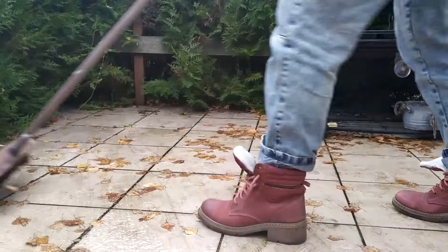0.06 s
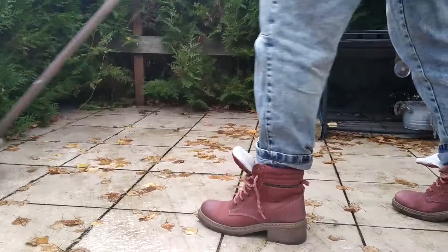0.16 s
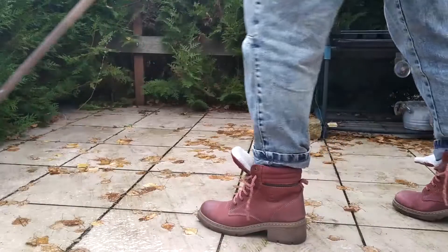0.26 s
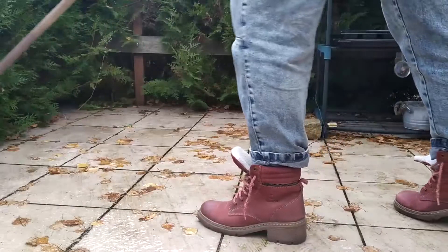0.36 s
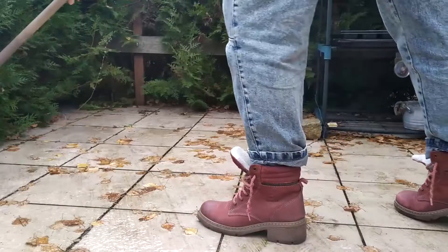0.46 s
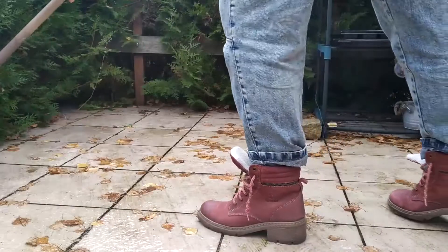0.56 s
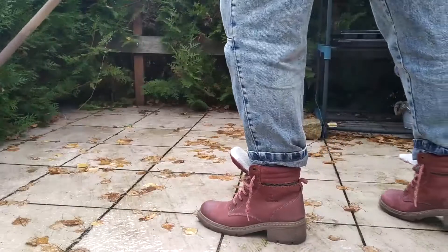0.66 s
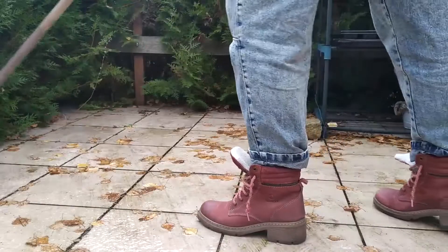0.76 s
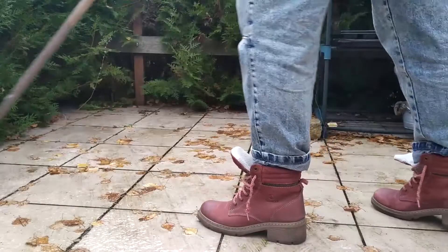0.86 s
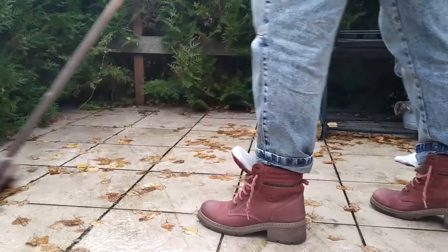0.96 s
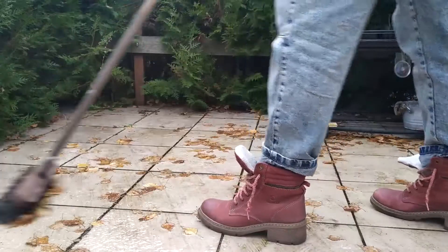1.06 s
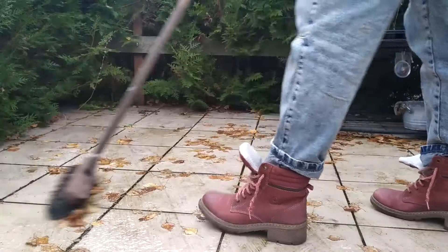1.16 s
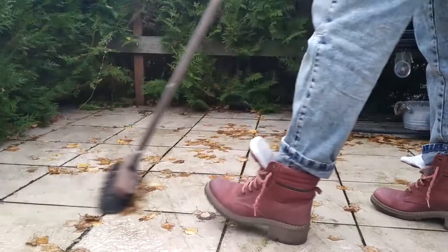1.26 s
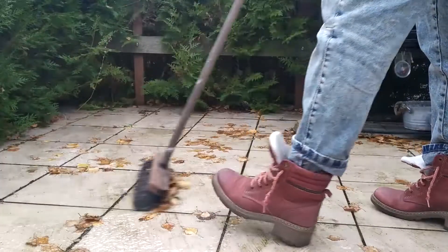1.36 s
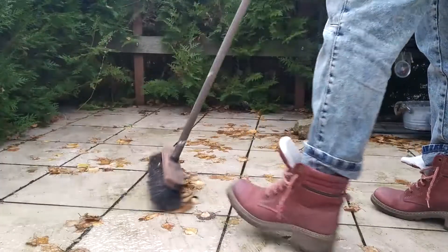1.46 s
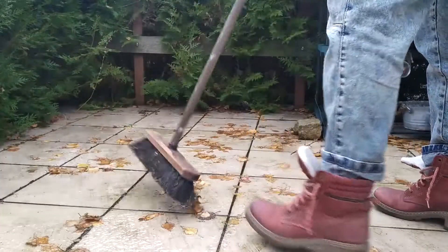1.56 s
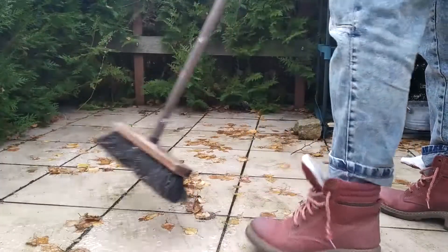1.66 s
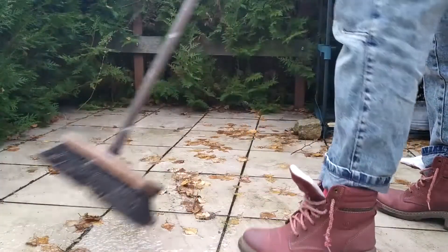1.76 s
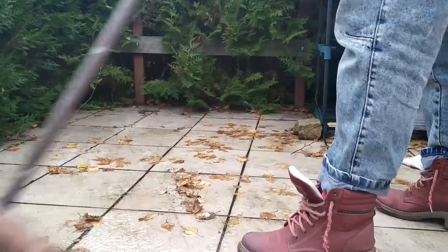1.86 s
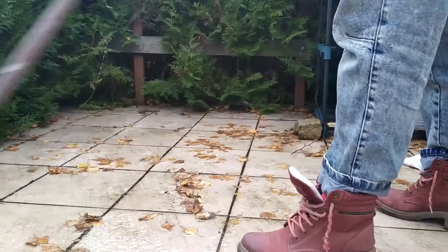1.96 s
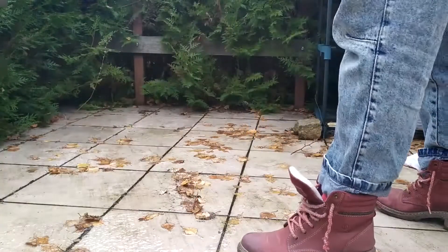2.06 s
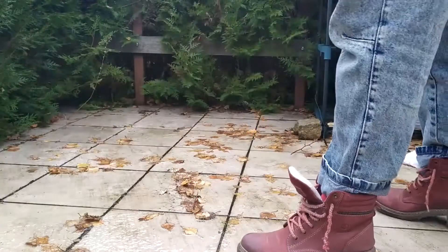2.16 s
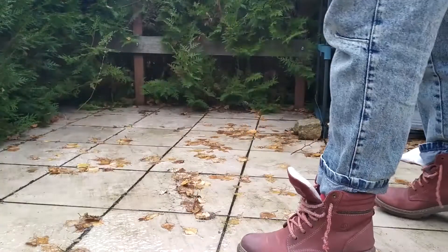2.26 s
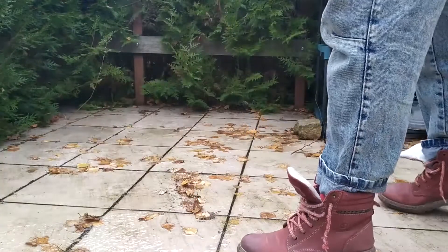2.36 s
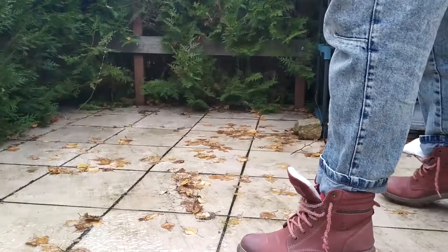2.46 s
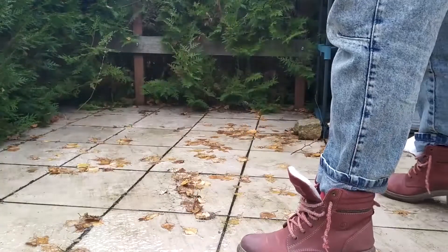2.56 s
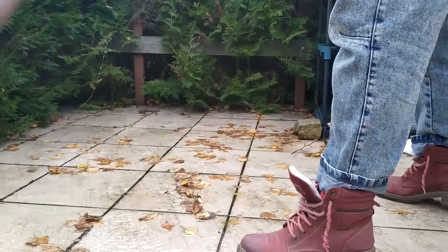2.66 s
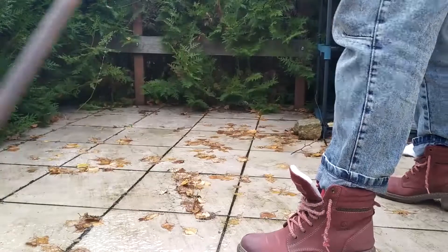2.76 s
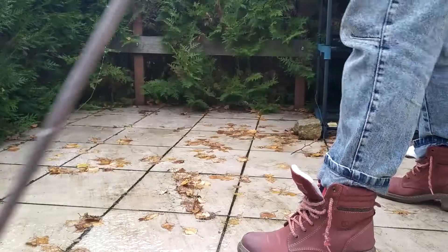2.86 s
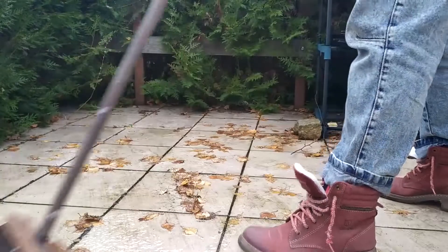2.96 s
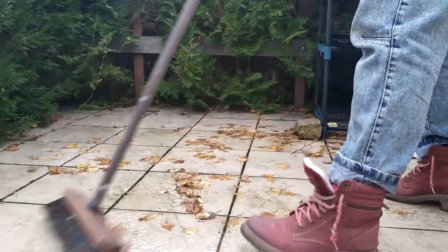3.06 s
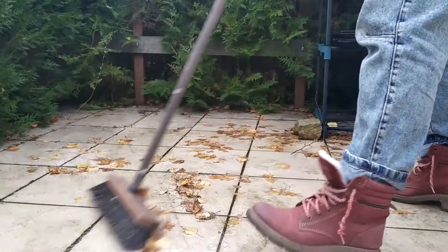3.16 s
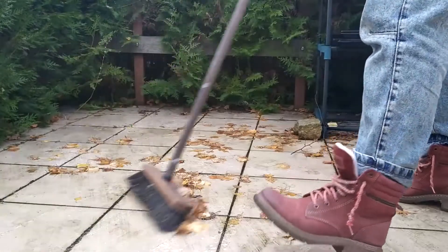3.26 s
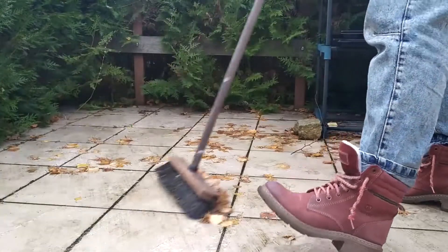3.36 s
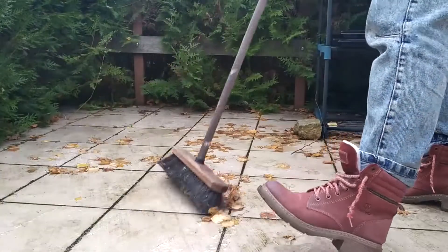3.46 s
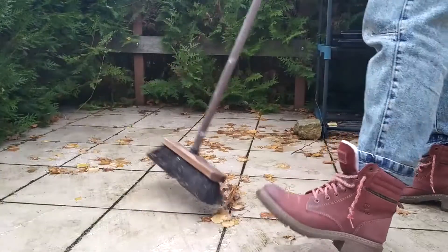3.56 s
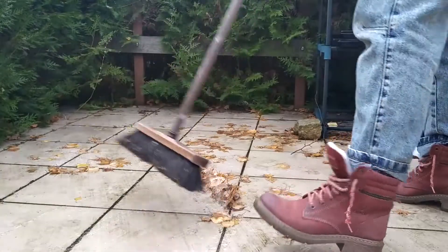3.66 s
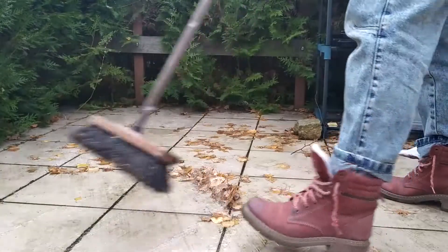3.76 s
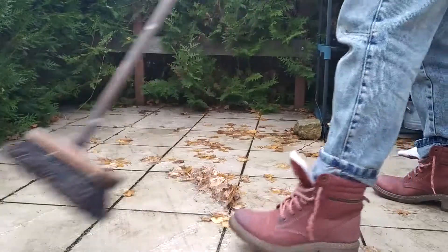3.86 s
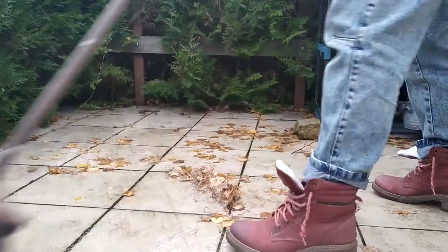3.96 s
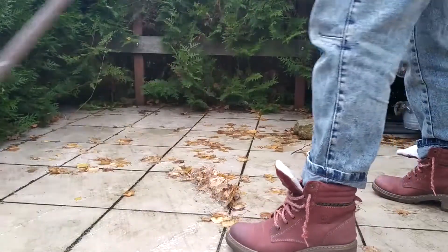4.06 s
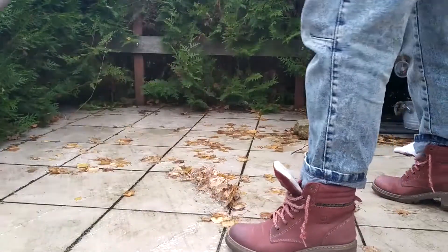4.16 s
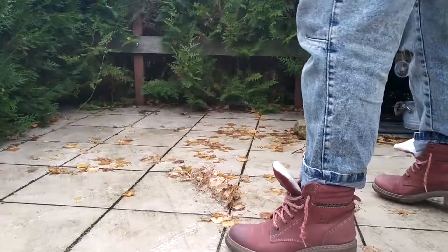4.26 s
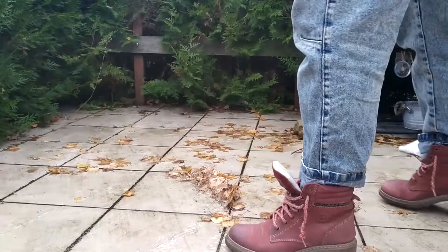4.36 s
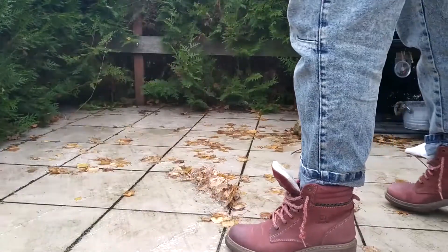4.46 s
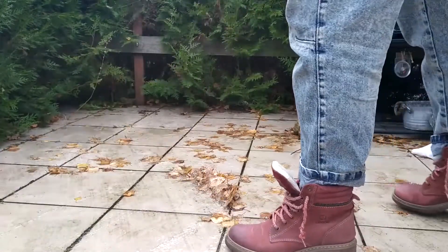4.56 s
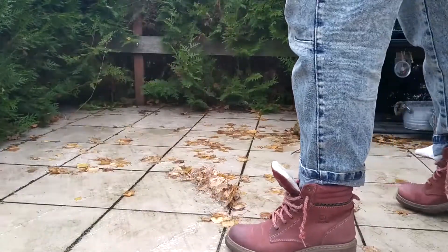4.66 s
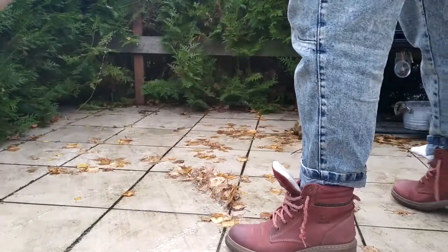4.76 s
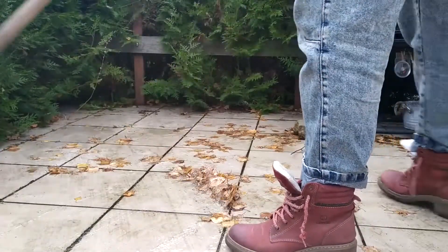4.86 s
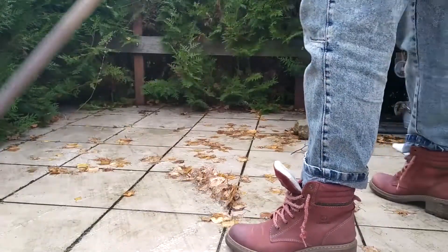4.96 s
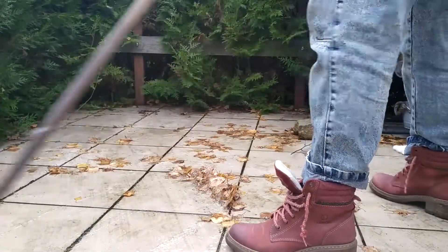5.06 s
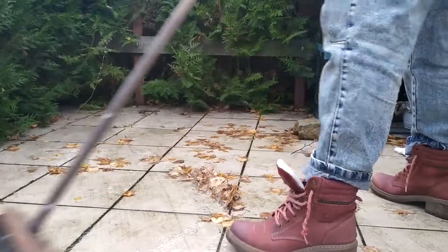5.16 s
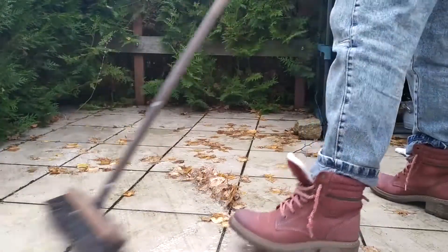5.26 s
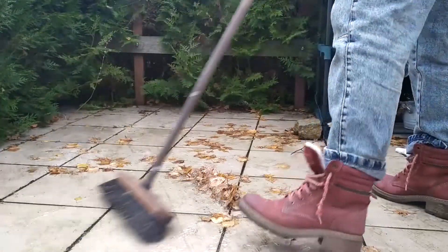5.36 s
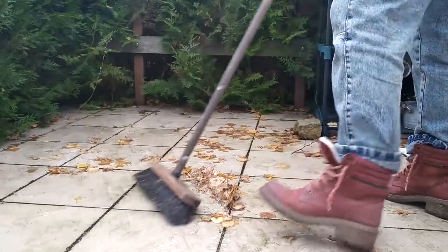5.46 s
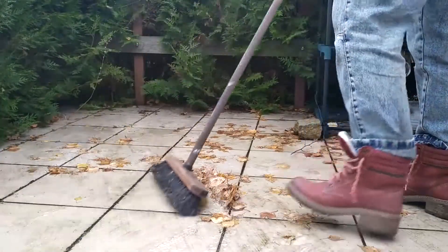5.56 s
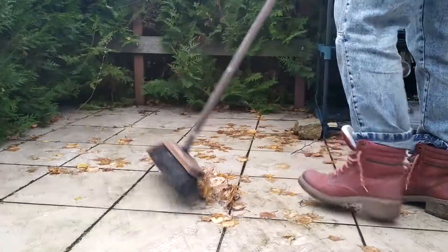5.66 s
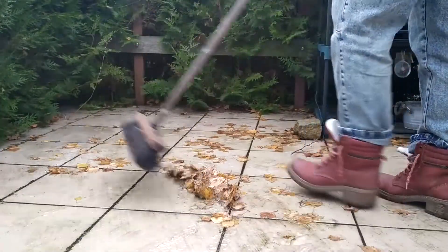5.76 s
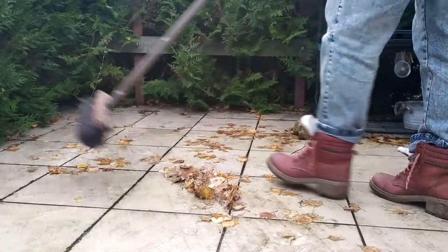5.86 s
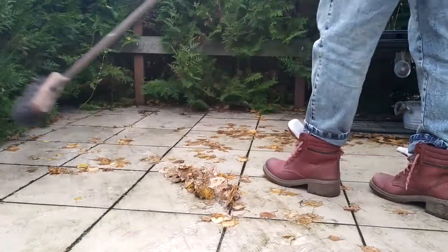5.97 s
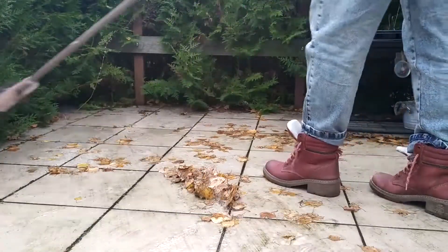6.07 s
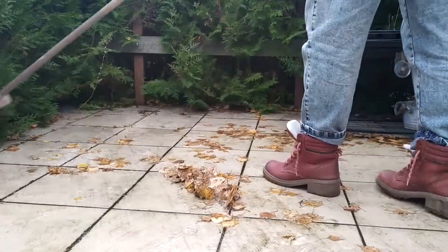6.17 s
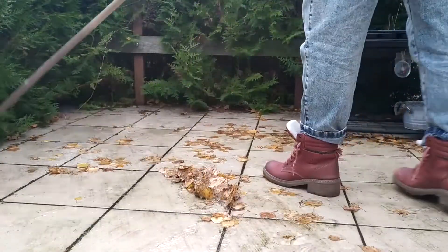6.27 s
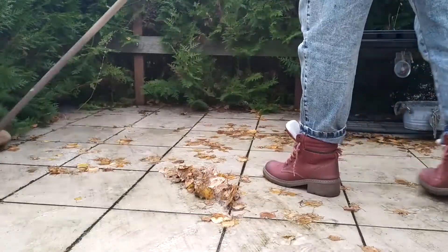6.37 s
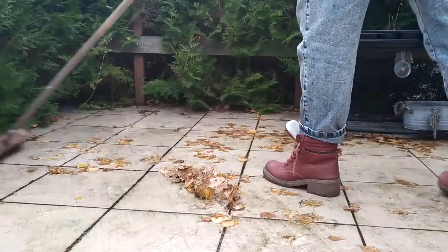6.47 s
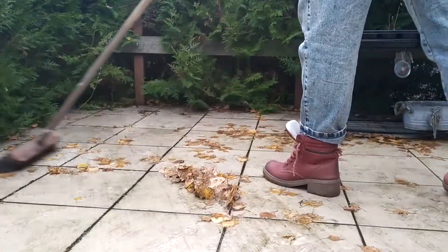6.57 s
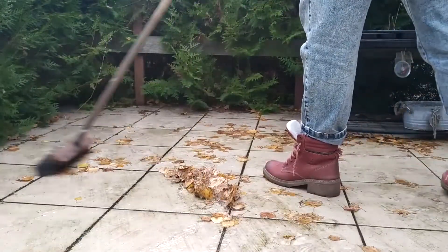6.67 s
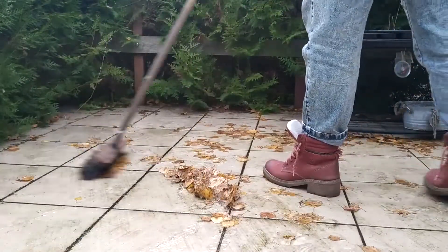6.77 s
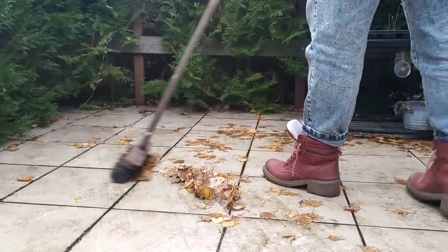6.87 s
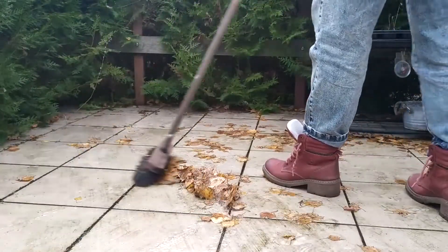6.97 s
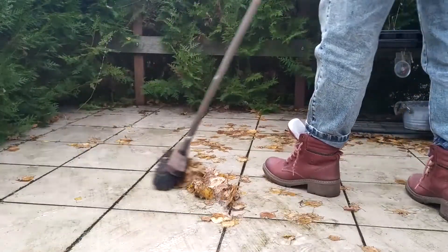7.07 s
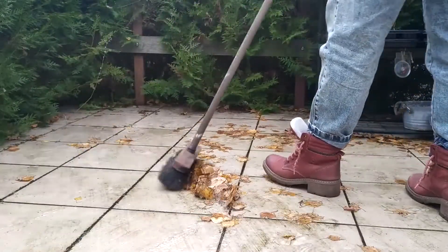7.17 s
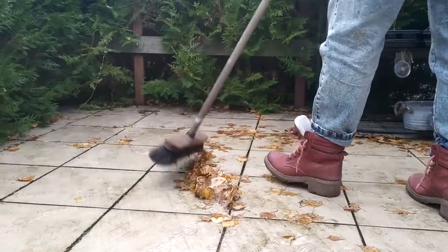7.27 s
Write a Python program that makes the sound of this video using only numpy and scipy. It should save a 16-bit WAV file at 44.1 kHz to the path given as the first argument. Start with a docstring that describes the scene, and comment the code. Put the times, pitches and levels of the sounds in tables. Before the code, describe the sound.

A stiff broom drags dead leaves over garden slabs in four harsh, bristly strokes, with boot shuffles, leaf snaps and faint distant traffic.

```python
"""Stiff broom among dead leaves

A stiff broom is dragged over paving slabs in a garden in four pulls, each passing from right to left.
Bristle tips stick and slip on the stone; leaves snap and crackle; boots and handle knock as damped bodies.
A far engine sounds as a harmonic series over filtered noise for the rumble of traffic and garden hush.
Two spaced microphones localise the broom by a changing lag; the right one is shaded in the treble.
"""
import sys
import numpy as np
from scipy import signal
from scipy.io import wavfile
from scipy.ndimage import uniform_filter1d, map_coordinates

SR = 44100
rng = np.random.default_rng(int(sys.argv[2]) if len(sys.argv) > 2 else 0)


def ratio_of_db(decibels):
    """Turn decibels (scalar or array-like) into linear amplitude factors; 0 dB maps to 1."""
    return 10 ** (np.asarray(decibels, float) / 20)


def transcribe(signal):
    """Save signal, clipped to [-1, 1], as a 16-bit WAV file at the path in sys.argv[1]."""
    frames = np.atleast_2d(signal).T
    limited = np.clip(frames, -1, 1)
    pcm = np.round(limited * 32767).astype(np.int16)
    wavfile.write(sys.argv[1], SR, pcm)


N = 322371

# Pulls, one list each: t/s, bristle hiss level/dB, bite of the stiff bristles into the stone/dB
PULLS = [
    [(.63, -62, -2), (.71, -45, -5.5), (.87, -42, -7), (.93, -40, -2.5), (1.08, -36.5, -2.5),
     (1.2, -42.5, -3), (1.36, -45, 4.5), (1.47, -46.5, 0.5), (1.59, -49.5, -2), (1.65, -66, 7)],
    [(2.5, -59, -4), (2.54, -49.5, -4), (2.67, -44, 3.5), (2.75, -40, 5), (2.89, -38.5, 6), (2.96, -36, -1),
     (3.11, -40, 7), (3.36, -40.5, 2.5), (3.48, -43.5, 0.5), (3.64, -58.5, 0)],
    [(4.6, -61, 2), (4.68, -45, -1.5), (4.76, -42.5, 2), (4.9, -37, 0), (5.03, -39, 1), (5.44, -39, -5.5),
     (5.56, -42, -1.5), (5.68, -47, 1.5), (5.77, -61, 4)],
    [(6.48, -53, -2.5), (6.62, -42.5, -6.5), (6.72, -42.5, -7), (6.78, -36, 0.5), (6.84, -40, -1),
     (7.0, -44.5, -0.5), (7.1, -45, 3.5), (7.19, -45, 8), (7.31, -53.5, 1.5)],
]
# Path of each pull: set down t/s, starts to move t/s, arrives t/s, left lag at start/us, on arrival/us
SWEEPS = [(.26, .77, 1.65, 300, 40), (2.2, 2.55, 3.6, 390, 30), (4.33, 4.6, 5.7, 430, 50),
          (6.2, 6.42, 7.15, 250, 65)]
# Broom set down, brushing the slabs: t/s, stay/s, level/dB, approach/(dB/s), bite/dB
BRUSHES = [(.31, .25, -44, 320, -4), (2.451, 0.013, -44.5, 134, -0.5), (4.529, 0.0083, -39, 166, 1),
           (6.429, 0.0031, -43, 190, 2.5)]
# Boots shuffling among the leaves: t/s, stay/s, level/dB
SHUFFLES = [(0, 0.14, -59), (1.66, 0.029, -66), (1.82, .02, -58.5), (2.01, .01, -64.5), (2.09, 0.048, -63),
            (3.91, 0.084, -68), (4.15, 0.13, -74), (5.8, 0.11, -65.5), (6.052, 0.012, -55.5),
            (6.25, 0.044, -55.5)]
# Spectral shapes of hiss, scrape and rasp: f/Hz, level/dB (per Hz)
HISS_SHAPE = [(3000, -55.5), (4700, -5.5), (6300, -4), (8000, 4), (11000, 2), (16000, -3)]
SCRAPE_SHAPE = [(1500, -17.5), (2200, -7.5), (3200, 0), (4700, -0.5), (7000, -10), (10000, -36)]
RASP_SHAPE = [(700, -23), (1000, -3.5), (1500, -1), (2200, 5.5), (3200, -50)]
# Share of the broom's power reaching both microphones alike, before focus: f/Hz, share
DIRECT_SHARE = [(1500, 0.92), (2500, 0.82), (4000, 0.63), (6000, 0.47), (9000, 0.23), (15000, 0.062)]
# Weight of the treble shading: f/Hz, factor
SHADE_WEIGHT = [(4400, 0.0053), (6000, 0.074), (8000, 1.05), (15000, 2.2)]
# Treble shading by place, before the weight: lag/us, left minus right level/dB
SHADE_BY_LAG = [(-100, 17), (50, 10.5), (276, 8), (420, 4)]
# Snaps of leaves and grit: t/s, peak level/dB, centre f/Hz
SNAPS = [(0.0704, -31, 12500), (.2972, -34, 5940), (1.062, -25, 6500), (1.074, -15.5, 11500),
         (1.077, -23, 9000), (1.0848, -24, 9500), (1.7145, -50, 10000), (1.783, -51, 9500),
         (1.832, -44, 11000), (2.006, -47, 12500), (2.02, -44, 9560), (2.054, -46.5, 6000),
         (2.156, -43, 7500), (2.232, -56, 7000), (3.254, -29.5, 8200), (3.9074, -34.5, 6300),
         (3.9177, -32, 10400), (3.967, -43, 10200), (4.017, -39, 7500), (4.2565, -52, 9000),
         (6.105, -33, 10900), (6.4193, -38, 9450), (6.433, -24.5, 8200)]
# Scuffs of soles and bristles on grit: t/s, peak level/dB, t60/s
SCUFFS = [(.289, -41, .02), (1.8098, -43, 0.095), (3.675, -45.5, 0.065), (3.889, -50, 0.24),
          (6.018, -49, .071), (6.047, -39, 0.077), (6.067, -44, 0.034), (6.2503, -42, .054)]
# Dull knocks of boots and handle: t/s, body peak level/dB, pitch f/Hz, t60/s, crack level/dB re body
KNOCKS = [(.018, -57, 2200, .006, -1), (0.0573, -39, 600, 0.013, 9.5), (.077, -37, 1420, 0.0036, -4),
          (0.092, -46.5, 189, 0.051, -14), (0.13, -47, 660, 0.014, 0), (0.204, -33.5, 1250, 0.011, -30),
          (.258, -54, 1600, 0.0058, 3), (1.205, -52, 543, 0.02, -15), (1.812, -46, 165, 0.016, -9),
          (4.992, -39.5, 263, 0.022, -20), (5.234, -47, 482, 0.012, -1), (6.019, -50, 193, 0.028, -22),
          (6.031, -54, 200, 0.014, -19), (6.06, -48.5, 380, 0.012, -1), (6.087, -51, 230, 0.014, 4),
          (6.1051, -42, 1590, 0.0034, -11), (6.118, -50, 220, 0.012, -9), (6.808, -38.5, 269, 0.015, 3),
          (6.965, -36.5, 275, 0.013, -12)]
# Far engine: t/s, mean firing f/Hz, level of upper harmonics/dB, level of lower harmonics/dB
ENGINE = [(5.25, 88.5, -83, -79), (5.42, 91, -73, -88), (5.62, 93, -66, -96), (5.95, 97, -67, -87),
          (6.09, 98, -66, -70), (6.22, 100, -82, -73), (6.5, 101.5, -80, -79), (6.75, 102.5, -87, -82)]
# Upper and lower harmonics of the firing rate: harmonic number, relative level/dB
WHINE_HARMONICS = [(4, 0), (5, -12)]
DRONE_HARMONICS = [(2, -1.4), (3, 0.41)]
# Spectral shape of traffic and garden: f/Hz, level/dB (per Hz)
AIR_SHAPE = [(15, -64), (30, -11), (45, -4.5), (65, 6.5), (90, 0.5), (120, -9.5), (166, -16.5),
             (400, -17.5), (936, -17.5), (1400, -21), (1890, -28.5), (4250, -33), (9000, -36), (16000, -38)]
# Course of the air: t/s, level/dB
AIR_COURSE = [(0.0, -59), (0.79, -58), (1.04, -59), (2.83, -61), (3.26, -58.5), (3.85, -60), (4.34, -60),
              (4.66, -58), (5.29, -59), (5.99, -58.5), (7.31, -59.5)]
# Correlation of the air between the microphones: f/Hz, likeness (-1 to 1)
AIR_LIKENESS = [(60, 1), (130, 0.87), (290, 0.76), (640, 0.31), (1410, -0.28), (3100, -0.096), (6820, 0.6),
                (15000, -0.55)]
# Balance of the air: f/Hz, left minus right level/dB
AIR_BALANCE = [(60, 1), (240, 1), (950, 0.5), (3770, 1.5), (15000, -9)]

BOOTS_US = -105  # left lag of what happens at the boots, between sweeps
SCRAPE_DB, RASP_DB, FINE_DB = -5.5, -16.5, 6  # re hiss, at no bite and full pressure
RASP_PER_BITE, FINE_PER_BITE = 0.95, -1.02  # dB per dB
RASP_FOLLOWS = 0.82  # share of the hiss swing about full pressure
FINE_PER_PRESSURE, FINE_PER_US = 0.1, -0.016  # dB per dB, dB per us: light or far touches are duller
FULL_DB, COLOUR_WANDER_DB = -42, 3.5
RUSTLE_DB, RUSTLE_SWING_DB, LEAF_BITE_DB = -69.5, 2, 3.5  # loose leaves stir all the time
LEAVES_DIRECT = 0.34  # loose leaves lie all around: share of the broom's likeness left to them
SHUFFLE_IN_DB_PER_S, SHUFFLE_OUT_DB_PER_S = 259, 237
LIFT_DB_PER_S, BRUSH_SAG_DB_PER_S = 276, 9.5  # a brush weakens while it stays
SNAP_T60_S, SCUFF_HZ = 0.0043, 9500


def broom(flicker_db=1.5, crackle_db=-17.5, crackle_t60=0.0027):
    """Stick-slip friction: random clicks coloured in third octaves, part coherent, part scattered."""
    hiss_db, bite_db, focus = contact()
    shade_db = shading()
    pressure_db = hiss_db - FULL_DB
    scrape_db = SCRAPE_DB + bite_db + COLOUR_WANDER_DB * drift(2.9)
    fine_db = FINE_DB + FINE_PER_BITE * bite_db + FINE_PER_PRESSURE * pressure_db
    fine_db += FINE_PER_US * place() + COLOUR_WANDER_DB * drift(3.1)
    rasp_db = RASP_DB + RASP_PER_BITE * bite_db - (1 - RASP_FOLLOWS) * pressure_db
    rasp_db += COLOUR_WANDER_DB * drift(11.5)

    # a leaf breaks at once and crumbles away
    breaks = abs(slips(900 * ratio_of_db(4.9 * drift(17)), 4.7, N))
    fall = ratio_of_db(-60 / (crackle_t60 * SR))
    crumbling = signal.lfilter([1], [1, -fall], breaks)
    crackle = 1 + ratio_of_db(crackle_db) * rms_one(crumbling)
    direct = crackle * slips(14000, 2.3, (2, N))
    scattered = crackle * slips(14000, 1.0, (2, 2, N))

    near, far = np.zeros((2, N)), np.zeros((2, N))
    together = drift(2.5)
    edges = 630 * 2 ** (np.arange(16) / 3)
    for k, (low, high) in enumerate(zip(edges, edges[1:])):
        hz = np.sqrt(low * high)
        # above 10 kHz the finest tips come in
        fine_share = np.clip(np.log2(hz / 10000) / 1.83, 0, 1)
        hiss = at_hz(HISS_SHAPE, hz) + fine_share * fine_db
        scrape = at_hz(SCRAPE_SHAPE, hz) + scrape_db
        rasp = at_hz(RASP_SHAPE, hz) + rasp_db
        power = ratio_of_db(2 * hiss) + ratio_of_db(2 * scrape) + ratio_of_db(2 * rasp)
        flicker = flicker_db * (0.093 * together + drift(14.2))
        gain = np.sqrt(power) * ratio_of_db(hiss_db + flicker)
        right_db = -at_hz(SHADE_WEIGHT, hz) * shade_db
        gain = gain * ratio_of_db([np.zeros(N), right_db])
        share = np.clip(at_hz(DIRECT_SHARE, hz) * focus, 0, 1)
        # neighbouring bands take independent clicks
        near += gain * np.sqrt(share) * band(direct[k % 2], low, high)
        far += gain * np.sqrt(1 - share) * band(scattered[k % 2], low, high)
    return near, far


def contact():
    """Addition of powers: hiss level of all that rubs, power-weighted bite, and share from one spot."""
    rows = []
    for pull in PULLS:
        rows += [(pull[0][0] - 0.03, -90, 0), *pull, (pull[-1][0] + 0.06, -90, 0)]
    pressure_db, bite_db = in_time(rows)
    leaves = ratio_of_db(2 * (RUSTLE_DB + RUSTLE_SWING_DB * drift(5.3)))
    leaves += sum(touch(*row, SHUFFLE_IN_DB_PER_S, SHUFFLE_OUT_DB_PER_S) for row in SHUFFLES)
    parts = [(ratio_of_db(2 * pressure_db), bite_db), (leaves, LEAF_BITE_DB)]
    for *row, bite in BRUSHES:
        parts.append((touch(*row, LIFT_DB_PER_S, BRUSH_SAG_DB_PER_S), bite))
    power = sum(part for part, _ in parts)
    mean_bite = sum(part * bite for part, bite in parts) / power
    focus = 1 - (1 - LEAVES_DIRECT) * leaves / power
    return 10 * np.log10(power), mean_bite, focus


def touch(s, stays, db, in_db_per_s, out_db_per_s, sag_db_per_s=0):
    """Exponential growth and decay: power of a contact that swells, stays and fades."""
    t = np.arange(N) / SR
    rise = in_db_per_s * np.maximum(s - t, 0)
    sag = sag_db_per_s * np.clip(t - s, 0, stays)
    fade = out_db_per_s * np.maximum(t - s - stays, 0)
    return ratio_of_db(2 * (db - rise - sag - fade))


def place():
    """Interaural-type time difference: left lag/us as the broom waits, eases across and yields to the boots."""
    t, lag = np.arange(N) / SR, np.full(N, float(BOOTS_US))
    for (down, start, arrive, first_us, last_us), pull in zip(SWEEPS, PULLS):
        way = np.clip((t - start) / (arrive - start), 0, 1)
        eased = way ** 2 * (3 - 2 * way)
        on_stone = (t > down) & (t < pull[-1][0] + 0.06)
        lag = np.where(on_stone, first_us + (last_us - first_us) * eased, lag)
    return uniform_filter1d(lag, size=400)


def shading():
    """Level difference: unweighted treble loss on the right, in dB, from the place of the sound."""
    return np.interp(place(), *np.transpose(SHADE_BY_LAG))


def snaps(width=1.38):
    """Impulsive fracture and scuffing: band noise with abrupt onset and exponential decay, right shaded."""
    out, t, shade_db = np.zeros((2, N)), np.arange(5000) / SR, shading()
    bursts = [(*row, SNAP_T60_S) for row in SNAPS]
    bursts += [(s, db, SCUFF_HZ, t60) for s, db, t60 in SCUFFS]
    for s, db, hz, t60 in bursts:
        i = round(s * SR)
        noise = rng.standard_normal(5000)
        burst = band(noise * ratio_of_db(-60 * t / t60), hz / width, hz * width)
        burst *= ratio_of_db(db) / abs(burst).max()
        right_db = -at_hz(SHADE_WEIGHT, hz) * shade_db[i]
        out[:, i:i + 5000] += burst * ratio_of_db([[0], [right_db]])
    return out


def knocks(echo_db=-13.0, echo_s=0.0062, crack_t60=0.0057):
    """Damped resonance struck through a soft contact, with a short crack and scatter off fence and slabs."""
    out, t = np.zeros(N), np.arange(4000) / SR
    for s, db, hz, t60, crack_db in KNOCKS:
        i = round(s * SR)
        noise = rng.standard_normal((2, 4000))
        struck = ring(t == 0, hz, max(t60, 0.004))
        body = ring(struck, 1.75 * hz, 1.07 / hz)  # the soft contact rounds the blow
        crack = band(noise[0] * ratio_of_db(-60 * t / crack_t60), 330, 4100)
        scatter = rms_one(band(noise[1], hz / 0.96, hz * 3.4))
        scatter *= np.minimum(t / echo_s, 1) * ratio_of_db(echo_db - 60 * t / 0.054)
        knock = -body / abs(body).max() + ratio_of_db(crack_db) * crack / abs(crack).max() + scatter
        out[i:i + 4000] += ratio_of_db(db) * knock
    return out


def engine():
    """Harmonic series: four partials of a rising, unsteady firing rate, fading in and out."""
    hz, whine_db, drone_db = in_time(ENGINE)
    phase = 2 * np.pi * np.cumsum(hz * (1 + 0.0043 * drift(4.14))) / SR
    begin, end = ENGINE[0][0], ENGINE[-1][0]
    fade, = in_time([(begin - 0.1, 0), (begin, 1), (end, 1), (end + 0.078, 0)])
    tones = [(k, db + whine_db) for k, db in WHINE_HARMONICS]
    tones += [(k, db + drone_db) for k, db in DRONE_HARMONICS]
    partials = sum(np.sqrt(2) * ratio_of_db(db) * np.sin(k * phase) for k, db in tones)
    return fade * ratio_of_db(1.8 * drift(6.6)) * partials


def air(patchy_db=0.4):
    """Partial coherence: bands of traffic and garden noise, their left-right likeness set by frequency."""
    out, edges = 0, 24 * 2 ** np.arange(0, 9.6, 0.4)
    white = rng.standard_normal((2, 2, N))
    for k, (low, high) in enumerate(zip(edges, edges[1:])):
        mid, side = band(white[k % 2], low, high)
        hz = np.sqrt(low * high)
        alike = np.clip(at_hz(AIR_LIKENESS, hz), -1, 1)
        left_db = at_hz(AIR_BALANCE, hz) / 2
        gain = ratio_of_db(at_hz(AIR_SHAPE, hz) + patchy_db * drift(3.2)) * ratio_of_db([[left_db], [-left_db]])
        out = out + gain * (np.sqrt(1 + alike) * mid + np.sqrt(1 - alike) * side * [[1], [-1]])
    return rms_one(out) * ratio_of_db(in_time(AIR_COURSE)[0])


def slips(per_s, spread_db, shape):
    """Random point process: stick-slip clicks, many small and a few large."""
    sizes = ratio_of_db(spread_db * np.minimum(rng.exponential(1, shape), 6))
    sizes *= rng.choice([-1, 1], shape)
    return rms_one(sizes * (rng.random(shape) < per_s / SR))


def ring(clicks, hz, t60):
    """Two-pole resonator: a unit click sets a decaying sine of initial height 1 ringing."""
    r, w = ratio_of_db(-60 / (t60 * SR)), 2 * np.pi * hz / SR
    return signal.lfilter([0, np.sin(w)], [1, -2 * r * np.cos(w), r * r], clicks)


def drift(rate):
    """Low-passed noise: slow chance of spread 1, computed at every 40th sample."""
    r = np.exp(-80 * np.pi * rate / SR)
    noise = rng.standard_normal(N // 40 + 2002)
    slow = signal.lfilter([1], [1, -2 * r, r * r], noise)[2000:]
    return np.interp(np.arange(N) / 40, np.arange(len(slow)), rms_one(slow))


def later(x, microseconds):
    """Propagation delay: read the sound with a changing lag."""
    return map_coordinates(x, [np.arange(N) - microseconds * SR / 1e6], order=3, mode="nearest")


def band(x, low_hz, high_hz):
    """Band-pass filtering between two frequencies."""
    edges = [low_hz, min(high_hz, 0.45 * SR)]
    return signal.sosfilt(signal.butter(2, edges, "band", fs=SR, output="sos"), x)


def rms_one(x):
    """Normalisation to unit root-mean-square."""
    return x / np.sqrt(np.mean(x ** 2) + 1e-20)


def in_time(rows):
    """Linear interpolation of each column over time."""
    s, *columns = np.transpose(rows)
    return [np.interp(np.arange(N) / SR, s, c) for c in columns]


def at_hz(points, hz):
    """Interpolation along a logarithmic frequency axis."""
    f, values = np.transpose(points)
    return np.interp(np.log(hz), np.log(f), values)


def scene():
    """Superposition: direct sound with the lag on the left, then scattered sound, engine and air."""
    direct, scattered = broom()
    left, right = direct + snaps() + knocks() * ratio_of_db([[0.6], [-0.6]])
    return np.array([later(left, place()), right]) + scattered + engine() + air()


def roll_off(x):
    """The treble ends steeply here."""
    return signal.sosfilt(signal.butter(12, 16840, fs=SR, output="sos"), x)


def record(dry):
    """Low-pass filtering: a steep filter cuts the top, 60 dB down from its stopband edge."""
    stop_hz = 16054.8
    low_pass = signal.cheby2(16, 60, stop_hz, fs=SR, output="sos")
    mix = signal.sosfilt(low_pass, dry)
    return roll_off(mix)


dry = scene()
out = record(dry)
transcribe(out)
```